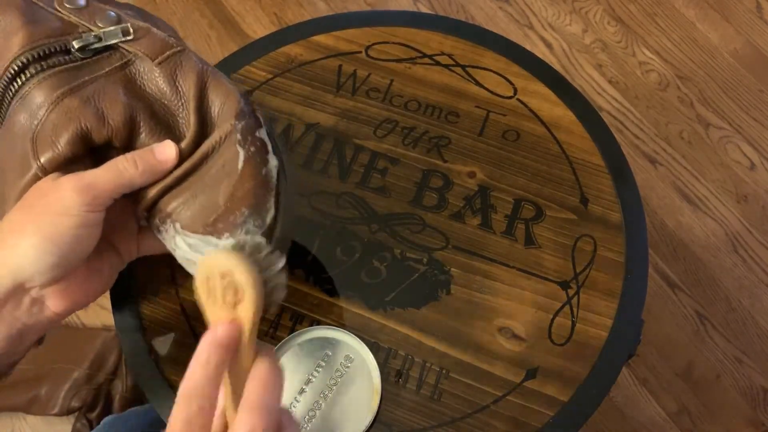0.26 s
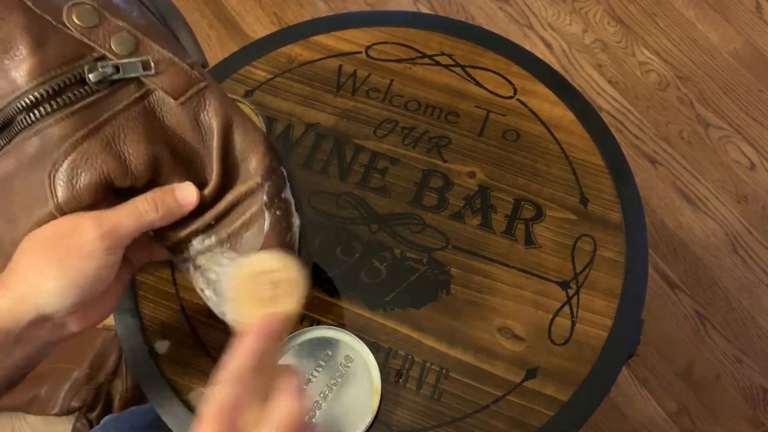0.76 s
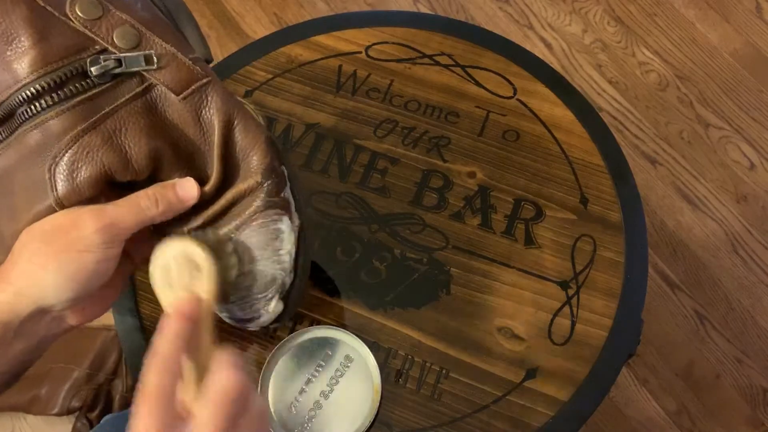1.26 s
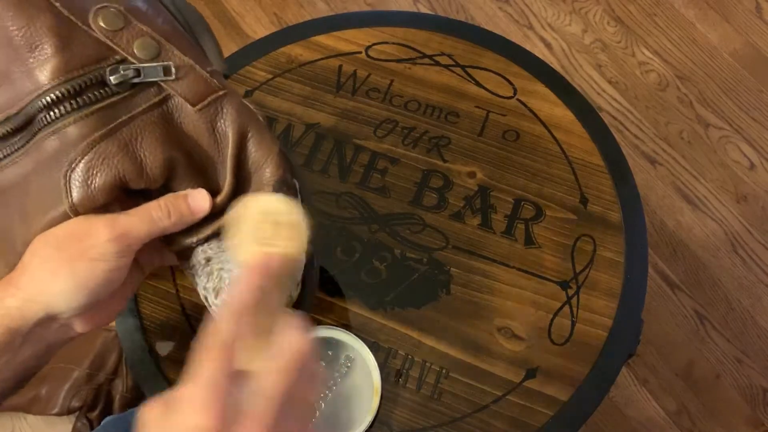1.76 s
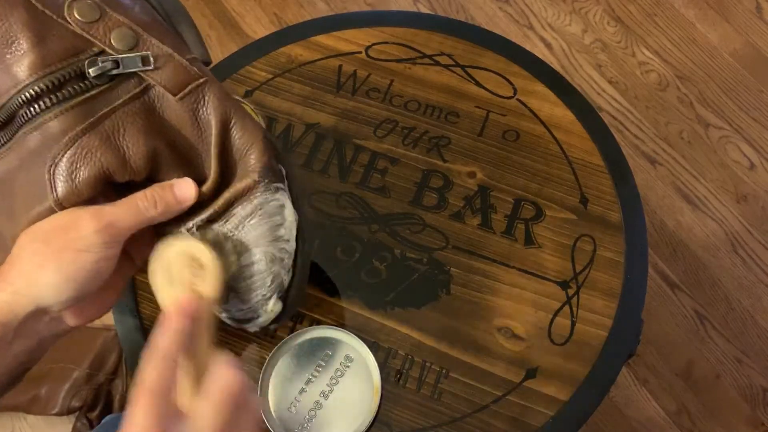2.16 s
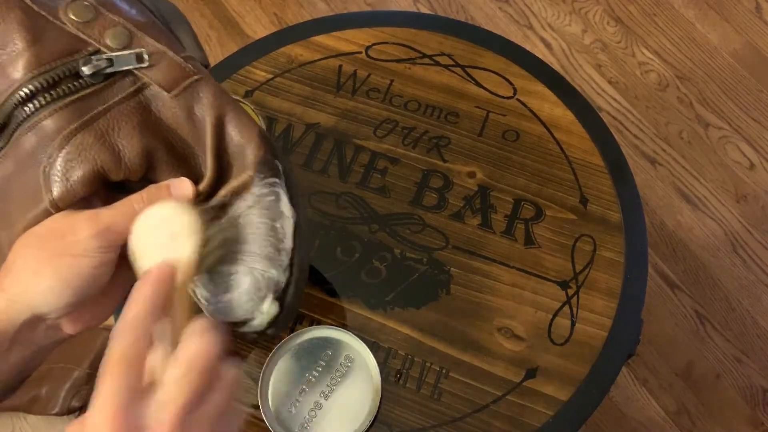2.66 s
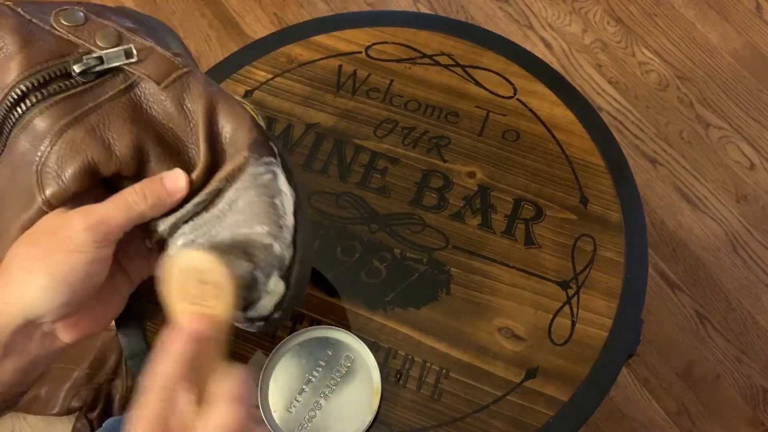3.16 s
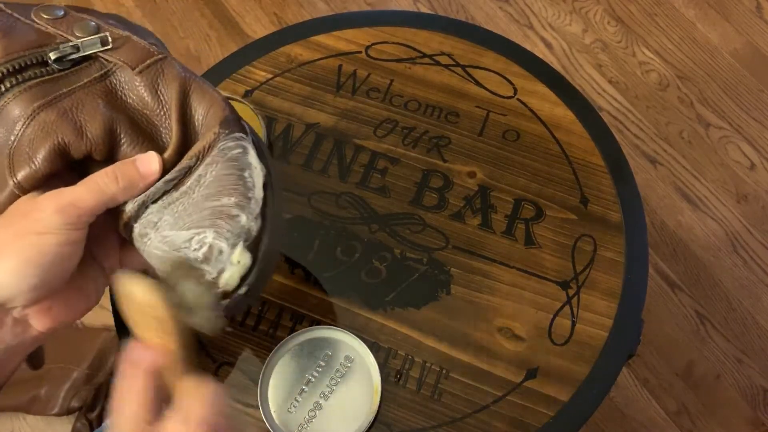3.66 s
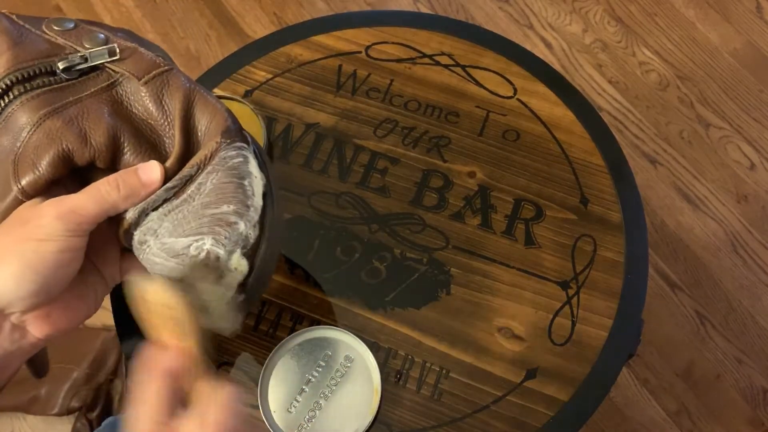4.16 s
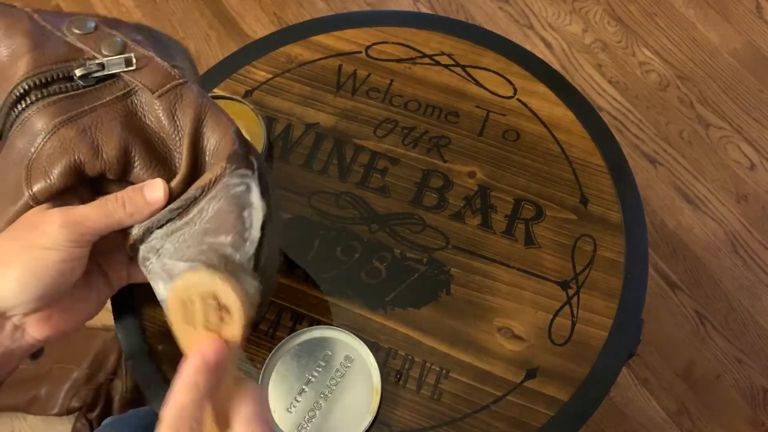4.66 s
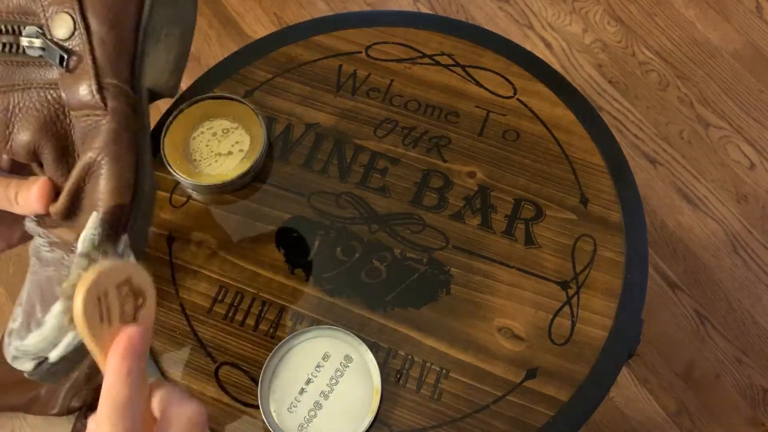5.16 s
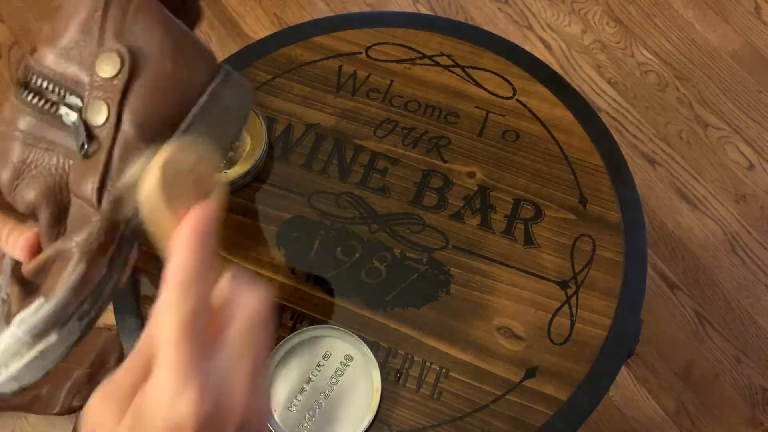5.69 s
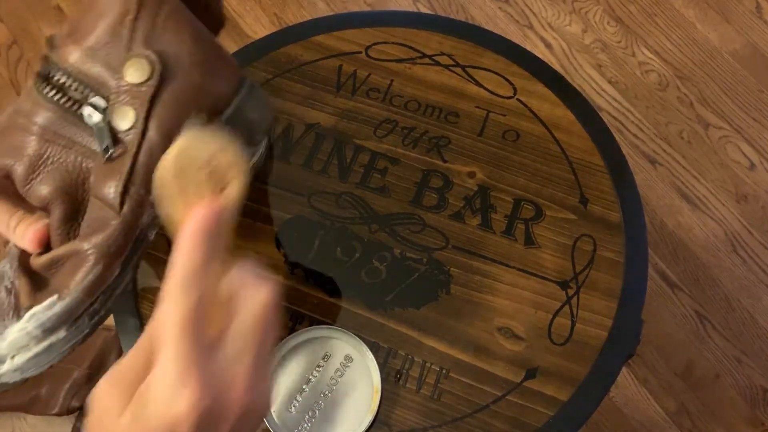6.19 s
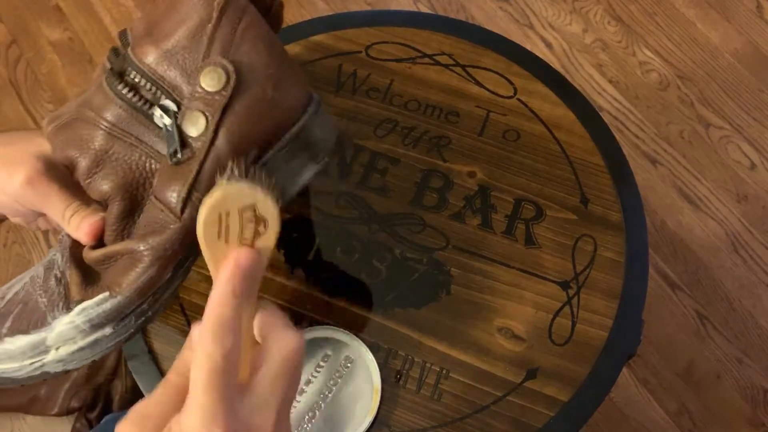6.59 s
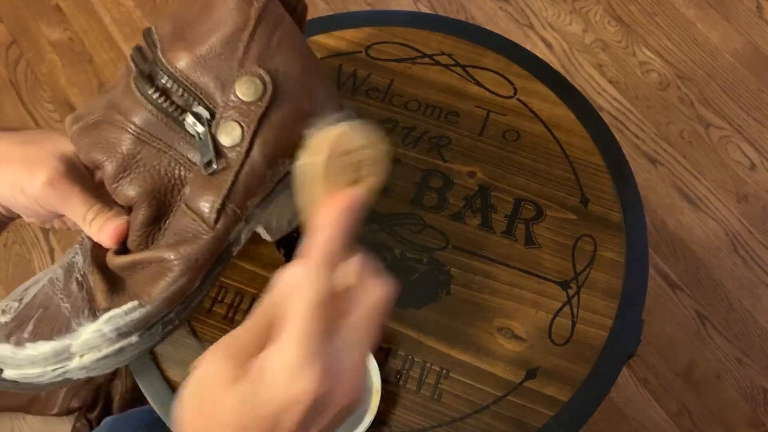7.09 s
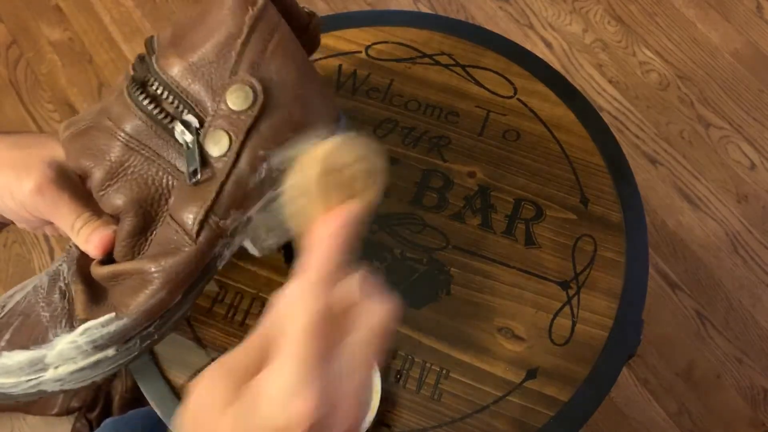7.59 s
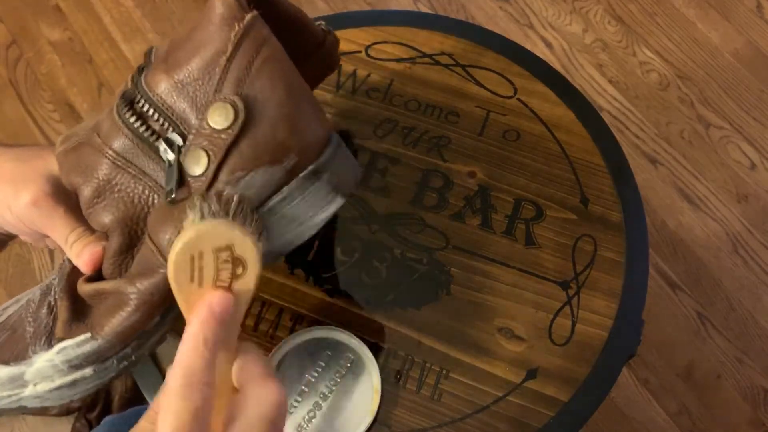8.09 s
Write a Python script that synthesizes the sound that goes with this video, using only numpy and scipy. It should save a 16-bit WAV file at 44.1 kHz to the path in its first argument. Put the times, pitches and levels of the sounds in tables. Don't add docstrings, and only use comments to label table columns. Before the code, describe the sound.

A small stiff bristle brush scrubs lather into a leather boot with quick scratchy back-and-forth strokes, close up, over a faint low hum.

```python
import sys
import numpy as np
from scipy import signal
from scipy.fft import rfft, irfft, next_fast_len
from scipy.io import wavfile
from scipy.ndimage import uniform_filter1d

SR = 44100
rng = np.random.default_rng(int(sys.argv[2]) if len(sys.argv) > 2 else 0)


def transcribe(signal):
    frames = np.atleast_2d(signal).T
    limited = np.clip(frames, -1, 1)
    pcm = np.round(limited * 32767).astype(np.int16)
    wavfile.write(sys.argv[1], SR, pcm)


def natural_amplitude(level_db):
    exponent = np.asarray(level_db, float) / 20
    return 10 ** exponent


N = 367794

# [t/s, first ring f/Hz, second ring f/Hz, strength of first (0-2),
# hollowness level/dB, lather level/dB]
LEATHER_PATCH = [(0, 1420, 3800, 0.84, -5.5, 6.5), (.4, 1450, 3870, 1.24, -4, 0.5),
                 (1.5, 1510, 3800, 1.27, -.5, 0.1), (2.3, 1420, 3780, 0.98, 1, -2),
                 (3, 1390, 3700, 0.73, 0.5, 1.1), (3.5, 1450, 3800, 0.93, -1, -2.2),
                 (4.6, 1420, 4000, 0.68, 0, -0.5), (4.8, 1500, 3440, .088, 3.5, -2.5),
                 (5.15, 1650, 3470, .2, 4, -5), (5.5, 1770, 3640, 0.44, 0.5, 7.5),
                 (5.8, 1850, 3670, .66, -1, -4.5), (6.3, 1840, 3580, 0.79, -3, 0.7),
                 (7, 1840, 3480, .6, .5, -1.3), (8.34, 1740, 3480, 0.45, 0, 0.1)]


def brush():
    swarm = flicks(per_s=12000, spread_db=1.5)
    low = signal.sosfiltfilt(signal.butter(2, 2200, fs=SR, output="sos"), swarm)
    fizz = signal.sosfiltfilt(signal.butter(2, 6800, "high", fs=SR, output="sos"), swarm)
    middle = swarm - low - fizz

    first_hz, second_hz, strength, hollow_db, lather_db = curves(LEATHER_PATCH)
    first_hz = first_hz * (1 + 0.025 * wander(13))
    second_hz = second_hz * (1 + 0.025 * wander(13))
    first_ring = resonate(resonate(low, first_hz, 500), first_hz, 500)
    leather = low + strength * first_ring
    second_ring = 0.5 * resonate(middle, second_hz, 500)
    lower_ring = 0.25 * resonate(middle, 0.72 * second_hz, 350)
    scratch = middle + second_ring + lower_ring

    patch_gain = natural_amplitude([hollow_db, np.zeros(N), lather_db])
    gain = np.sqrt(stroke_power() + creep_power()) * patch_gain
    catch = natural_amplitude(0.41 * wander(64) + 0.5 * wander(33))
    bands = [evened(band) * natural_amplitude(0.19 * wander(33)) for band in (leather, scratch, fizz)]
    return mottled(catch * (gain * bands).sum(0), patchy_db=2.2)


# [f/Hz, level/dB]
FLICK_COLOUR = [(150, -22), (500, -9), (1000, -7), (2000, -2.5), (3000, -1.5), (4500, -2.5), (6000, -4),
                (7800, -4.5), (8300, 0), (10300, -1.5), (11000, -4), (13300, -5), (15000, -8), (15900, -9)]


def flicks(per_s, spread_db):
    size = natural_amplitude(spread_db * np.minimum(rng.exponential(1, N), 5))
    slips = size * rng.choice([-1., 1.], N) * (rng.random(N) < per_s / SR)
    return evened(signal.oaconvolve(slips, causal(FLICK_COLOUR))[:N])


def stroke_power():
    t = np.arange(0, N + 64, 64) / SR
    power = 0
    for (peak_s, db, rise_s, fall_s), colour_db, _ in coloured_strokes():
        side_s = np.clip(np.where(t < peak_s, rise_s, fall_s), 0.005, 1)
        from_peak = abs(t - peak_s) / side_s
        colour = natural_amplitude(2 * np.array(colour_db)[:, None])
        power = power + natural_amplitude(2 * (db - 11.5 * from_peak ** 2.57)) * colour
    return np.array([np.interp(np.arange(N) / SR, t, band) for band in power])


# [t/s at full speed, level/dB, speed-up t/s, slow-down t/s]
TOE_STROKES = [(.37, -48, 0.053, .067), (.516, -46.5, 0.042, 0.045), (.644, -45.5, 0.045, 0.051),
               (.791, -47, 0.086, 0.068), (.979, -44, 0.084, 0.03), (1.092, -45, 0.041, .051),
               (1.24, -43, .042, 0.052), (1.365, -44.5, 0.045, 0.051), (1.535, -44, 0.04, 0.062),
               (1.67, -47, 0.053, 0.056), (1.828, -43.5, 0.062, 0.056), (1.951, -48, .056, 0.064),
               (2.107, -44, 0.061, 0.052), (2.237, -50.5, 0.12, .15), (2.407, -42.5, 0.066, .045),
               (2.528, -49.5, 0.17, 0.14), (2.661, -44, 0.047, 0.05), (2.77, -48.5, 0.083, 0.11),
               (2.96, -46, 0.065, 0.044), (3.07, -54, .09, 0.056)]
SEAM_STROKES = [(3.227, -44.5, 0.033, 0.058), (3.344, -46.5, 0.033, 0.072), (3.492, -43, 0.045, 0.044),
                (3.616, -42, 0.037, 0.051), (3.73, -44.5, 0.036, 0.044), (3.878, -46.5, 0.045, 0.031),
                (3.975, -44.5, .024, 0.045), (4.111, -42.5, 0.041, 0.037), (4.221, -42.5, .035, .041),
                (4.356, -43, .043, .038), (4.47, -43.5, 0.05, 0.048), (4.576, -46.5, 0.019, 0.075)]
HEEL_STROKES = [(5.375, -44.5, 0.1, 0.036), (5.504, -47.5, 0.041, 0.061), (5.698, -42.5, 0.071, 0.13),
                (5.928, -45, 0.058, .059), (6.095, -42, 0.066, 0.045), (6.239, -43, 0.052, 0.068),
                (6.423, -45, .062, 0.038), (6.562, -42.5, 0.049, 0.054), (6.732, -45, 0.068, .038),
                (6.864, -42, .042, .054), (7.027, -43.5, .061, 0.04), (7.155, -43, 0.041, 0.055),
                (7.316, -42.5, 0.055, 0.046), (7.458, -43, 0.061, 0.048), (7.614, -40.5, 0.069, .045),
                (7.756, -43.5, 0.072, 0.055), (7.927, -41.5, 0.078, 0.037), (8.06, -42, .059, 0.056),
                (8.23, -41.5, 0.074, 0.031), (8.345, -42.5, .037, .03)]
LOOSE_STROKES = [
    (.005, -59, .02, 0.048),
    (.132, -60, .027, .025),
    (.228, -52.5, .02, 0.073),
    (4.715, -57.5, .021, .032),
    (4.921, -60, .15, .08),
    (5.15, -49.5, 0.066, 0.046),
    (5.28, -57, 0.044, .073),
]
# [leather level/dB, middle level/dB, fizz level/dB]
STROKE_COLOURS = [
    [(-7.5, -4, 2), (-12.5, -5, -1)],
    [(-13, -4.5, -3.5), (-10, -5, 0.1)],
    [(-13.5, -4.5, -3), (-10.5, -4.5, -3.5)],
    [(-7, -5.5, -3.5), (-8.5, -5, -1.5)],
]
# [leather level/dB, middle level/dB, fizz level/dB]
TURN_COLOURS = [
    [(-57, -55.5, -53.5), (-65.5, -59.5, -60.5)],
    [(-63.5, -63.5, -78), (-79, -59, -71)],
    [(-64.5, -59.5, -63), (-58, -63, -75)],
    [(-65.5, -68, -67), (-67.5, -66, -68)],
]


def coloured_strokes():
    places = (TOE_STROKES, SEAM_STROKES, HEEL_STROKES, LOOSE_STROKES)
    strokes = []
    for rows, run, turn in zip(places, STROKE_COLOURS, TURN_COLOURS):
        for k, row in enumerate(rows):
            strokes.append((row, run[k % 2], turn[k % 2]))
    return sorted(strokes)


# [t/s, contact level/dB]
CONTACT_PRESSURE = [(0, 9), (.09, -9), (.18, -28), (.29, -1), (.6, 3), (1.6, 1), (2.7, 0.5), (2.87, 3.5),
                    (3.1, 1), (3.3, 1), (3.45, -2), (4.4, 2), (4.7, -3.5), (4.85, 0.5), (5.0, 3),
                    (5.04, -20), (5.09, -12), (5.3, -2)]


def creep_power():
    strokes = coloured_strokes()
    turns = []
    for (before, _, colour_db), (after, _, _) in zip(strokes, strokes[1:]):
        turns.append(((before[0] + after[0]) / 2, *colour_db))
    return natural_amplitude(2 * (np.array(curves(turns)) + curves(CONTACT_PRESSURE)[0]))


def mottled(x, patchy_db):
    z = signal.stft(x, nperseg=512)[2]
    patches = uniform_filter1d(rng.standard_normal(z.shape), size=2, axis=0)
    patches = uniform_filter1d(patches, size=6, axis=1)
    return signal.istft(z * natural_amplitude(patchy_db * evened(patches)), nperseg=512)[1][:N]


# [t/s, peak level/dB]
BRISTLE_SNAPS = [(0.1027, -63), (0.1201, -52), (0.2084, -43), (0.3426, -44), (0.8684, -32), (1.51, -39),
                 (3.181, -30), (3.4565, -40), (3.5933, -31), (4.077, -33), (4.5714, -24.5), (5.083, -35.5),
                 (8.151, -33)]


def snaps():
    out, t = np.zeros(N + 400), np.arange(400) / SR
    sprays = rng.standard_normal((len(BRISTLE_SNAPS), 400))
    for (s, db), spray in zip(BRISTLE_SNAPS, sprays):
        click = (t == 0) + 0.17 * spray * np.exp(-t / 0.003)
        out[round(s * SR):][:400] += natural_amplitude(db + 9.5) * click
    return signal.oaconvolve(out, causal(FLICK_COLOUR))[:N]


# [t/s, level/dB, f/Hz, decay t60/s]
BOOT_THUDS = [(.62, -45.5, 243, 0.26), (1.0, -50, 230, 0.13), (1.187, -44, 520, .053),
              (1.219, -47, 228, .15), (1.494, -46, 417, .034), (1.758, -39, 398, 0.061),
              (1.758, -44.5, 177, 0.13), (1.757, -40.5, 1150, 0.036), (2.069, -48, 236, 0.23),
              (2.369, -51, 247, 0.2), (2.622, -41, 234, 0.2), (2.918, -46.5, 241, 0.17),
              (2.931, -43, 700, .037), (4.077, -51, 191, 0.16), (5.68, -44.5, 900, 0.13),
              (5.905, -54, 632, 0.2), (6.834, -54, 654, 0.27), (7.26, -43.5, 661, .15),
              (7.554, -44.5, 700, 0.14), (7.879, -46, 745, .047)]


def thuds():
    out, t = np.zeros(N + SR), np.arange(SR // 2) / SR
    pushes = rng.standard_normal((len(BOOT_THUDS), len(t)))
    for (s, db, hz, t60), push in zip(BOOT_THUDS, pushes):
        rough = np.clip(hz / 800, 0, 1)
        swell_s = 0.52 * t60 ** 2
        tone = (1 - rough ** 2) * np.sin(2 * np.pi * hz * t)
        noise = rough * 0.86 * evened(resonate(push, hz, 0.6 * hz))
        onset = 1 - np.exp(-(t / max(swell_s, 5e-4)) ** 2)
        decay = natural_amplitude(-60 * np.maximum(t - swell_s, 0) / t60)
        out[round(s * SR):][:len(t)] += natural_amplitude(db) * (tone + noise) * onset * decay
    return out[:N]


# [f/Hz, lag/turns]
RIGHT_PORT_LAG = [(0, 0), (1500, .01), (2600, .15), (3600, .25), (4150, .335), (4900, .5), (22050, 4.525)]
# [f/Hz, share (0-1)]
SCATTER_SHARE = [(200, .2), (600, .5), (1400, .12), (2600, .4), (4500, .3), (9000, .33), (13000, .32)]


def ports(x):
    n = next_fast_len(N + 512)
    hz = np.fft.rfftfreq(n, 1 / SR)
    share = np.clip(read(SCATTER_SHARE, hz), 0, 0.95)
    late = np.exp(-2j * np.pi * np.interp(hz, *np.transpose(RIGHT_PORT_LAG)))
    direct = rfft(x, n) * np.sqrt(1 - share ** 2) * np.array([np.ones_like(late), late])
    scattered = share * rfft([scrambled(x), scrambled(x)], n)
    return irfft(direct + scattered, n)[:, :N]


def scrambled(x):
    z = signal.stft(x, nperseg=128)[2]
    new_phase = np.exp(2j * np.pi * rng.random(z.shape))
    return 1.4 * signal.istft(z * new_phase, nperseg=128)[1][:N]


def room(x):
    shape = (2, SR // 3)
    taps = rng.choice([-1., 1.], shape) * (rng.random(shape) < 0.05)
    taps[:, :130] = 0
    hz, t, z = signal.stft(taps, SR, nperseg=128)
    t60 = read([(300, 0.9), (3000, 0.26), (7000, 0.15)], hz)[:, None]
    tail = signal.istft(z * natural_amplitude(-60 * t / t60), SR, nperseg=128)[1]
    return signal.fftconvolve(x[None], tail / np.linalg.norm(tail[0]), axes=1)[:, :N]


# [multiple of the turning rate, level/dB rms]
MOTOR_ORDERS = [(1, -69), (3, -71), (4, -77.5), (5, -63), (6, -69), (7, -77.5), (8, -79.5)]


def hum():
    motor_hz = 59.16
    turns = np.cumsum(motor_hz * (1 + 0.0019 * wander(0.77))) / SR
    lines = np.zeros(N)
    for order, db in MOTOR_ORDERS:
        strength = natural_amplitude(db + 3.5 + 0.65 * wander(7.9))
        lines += strength * np.sin(2 * np.pi * (order * turns + rng.random()))
    return lines * natural_amplitude([[-1.3], [1.3]])


# [f/Hz, level/dB per Hz]
ROOM_NOISE_COLOUR = [(18, -3), (35, -3), (58, -12), (80, -6.5), (100, 1), (125, -18), (175, 0), (230, -7.5),
                     (310, -6.5), (420, -11),
                     (700, -20), (1300, -29), (2500, -33), (15000, -42)]
# [f/Hz, likeness (0-1)]
RUMBLE_LIKENESS = [(30, 1), (250, 0.82), (500, 0), (2000, 0.4)]
# [f/Hz, left minus right level/dB]
RUMBLE_BALANCE = [(30, 1.5), (170, -0.5), (350, -6), (700, 0), (2000, -8)]


def rumble():
    frames, hz = N // 512 + 5, np.fft.rfftfreq(2048, 1 / SR)
    a, b, c, d, patches = rng.standard_normal((frames, len(hz), 5)).T
    patches = uniform_filter1d(patches, size=3, axis=0)
    patches = evened(uniform_filter1d(patches, size=12, axis=1))

    same = np.clip(read(RUMBLE_LIKENESS, hz), -1, 1)[:, None]
    left = a + 1j * b
    right = same * left + np.sqrt(1 - same ** 2) * (c + 1j * d)
    lean_db = read(RUMBLE_BALANCE, hz)[:, None] / 2
    colour_db = read(ROOM_NOISE_COLOUR, hz)[:, None] + 3.54 * patches
    z = np.array([left, right]) * natural_amplitude(colour_db + np.array([lean_db, -lean_db]))
    air = signal.istft(z, nperseg=2048, noverlap=1536)[1][:, :N]
    return natural_amplitude(-57.5) * evened(air)


def resonate(x, hz, width_hz):
    turn = np.exp(2j * np.pi * np.cumsum(hz * np.ones(len(x))) / SR)
    r = np.exp(-np.pi * width_hz / SR)
    smooth = signal.lfilter([1 - r], [1, -r], x / turn + 1e-18)
    return 2 * (turn * smooth).real


def causal(points):
    log_gain = np.log(natural_amplitude(read(points, abs(np.fft.fftfreq(2048, 1 / SR)))))
    return np.fft.ifft(np.exp(np.conj(signal.hilbert(log_gain)))).real[:1024]


def wander(hz):
    return evened(signal.lfilter(*signal.butter(2, hz, fs=SR), rng.standard_normal(N)))


def evened(x):
    return x / np.sqrt(np.mean(x ** 2) + 1e-20)


def read(points, hz):
    f, value = np.transpose(points)
    return np.interp(np.log(hz + 1), np.log(f + 1), value)


def curves(rows):
    s, *columns = np.transpose(rows)
    return [np.interp(np.arange(N) / SR, s, column) for column in columns]


def scene():
    near = brush() + snaps() + thuds()
    return ports(near) + natural_amplitude(-13.5) * room(near) + hum() + rumble()


def top_cut(x):
    return signal.sosfilt(signal.butter(12, 15830, fs=SR, output="sos"), x)


def record(dry):
    low_pass = signal.firwin(801, 15800, window=("kaiser", 10), fs=SR)
    limited = signal.oaconvolve(dry, low_pass[None], "same")
    return top_cut(limited)


dry = scene()
out = record(dry)
transcribe(out)
```